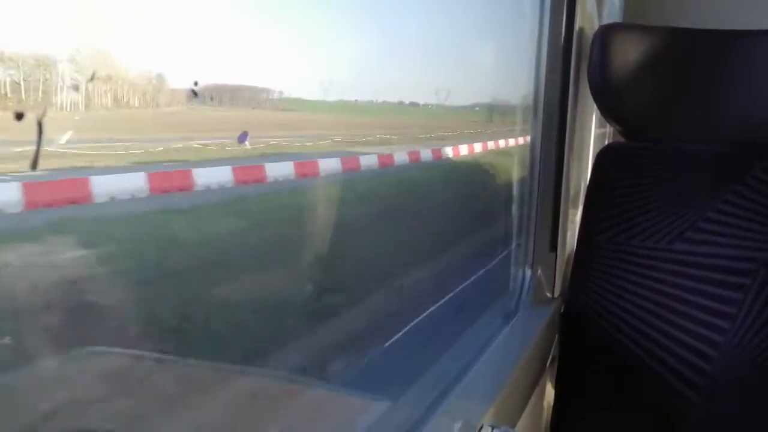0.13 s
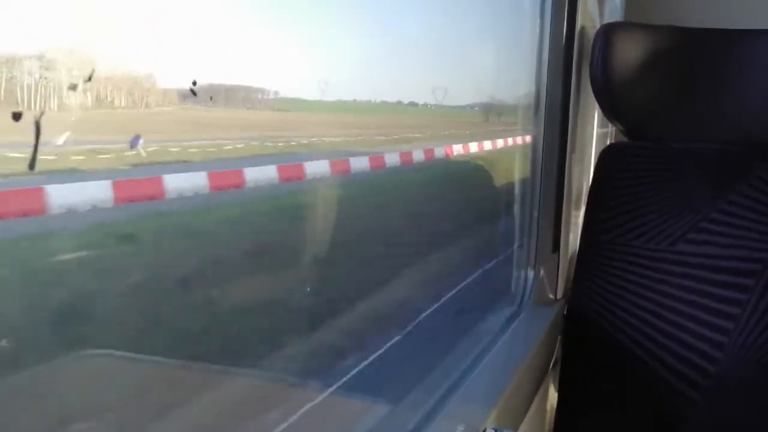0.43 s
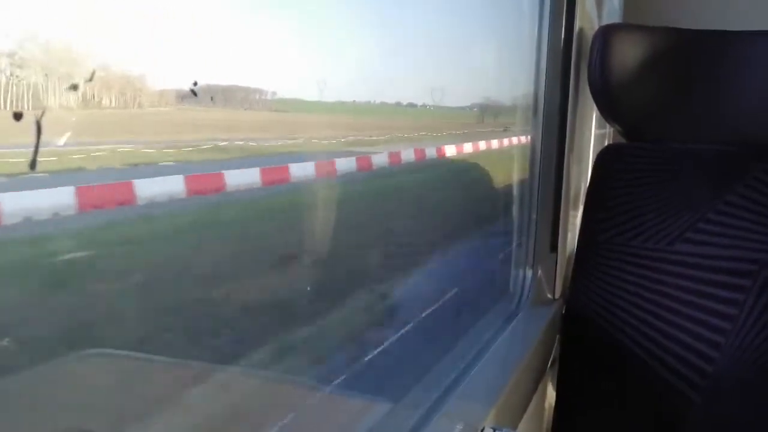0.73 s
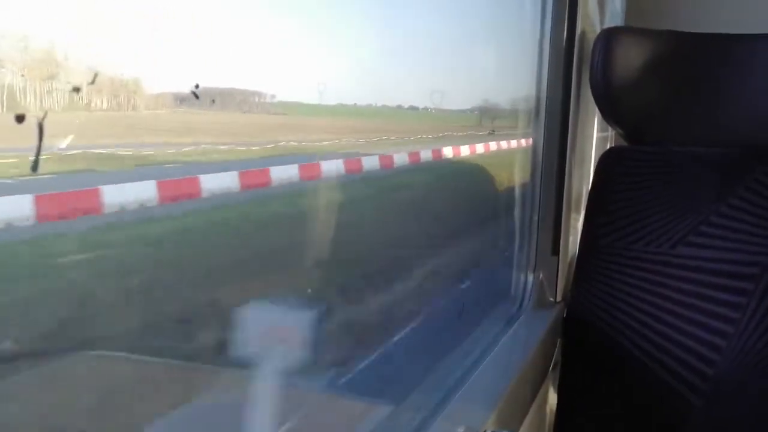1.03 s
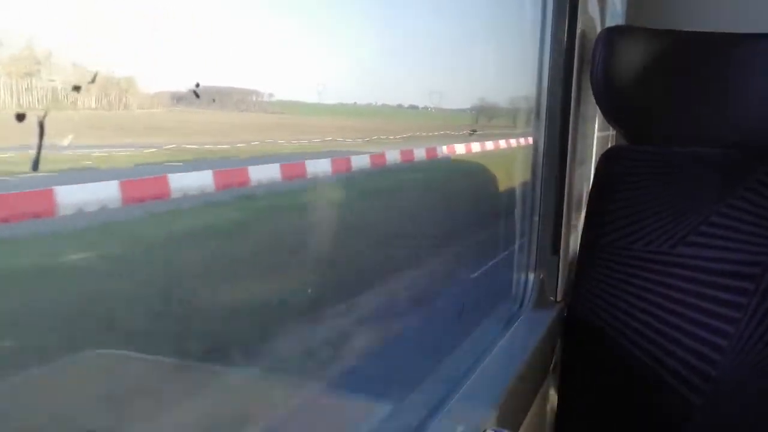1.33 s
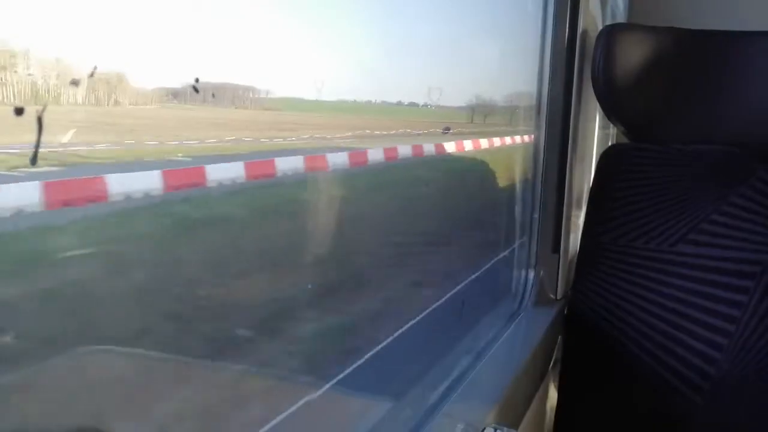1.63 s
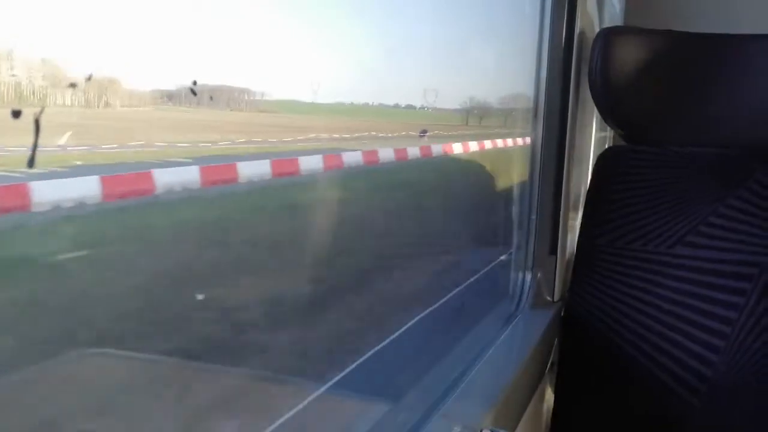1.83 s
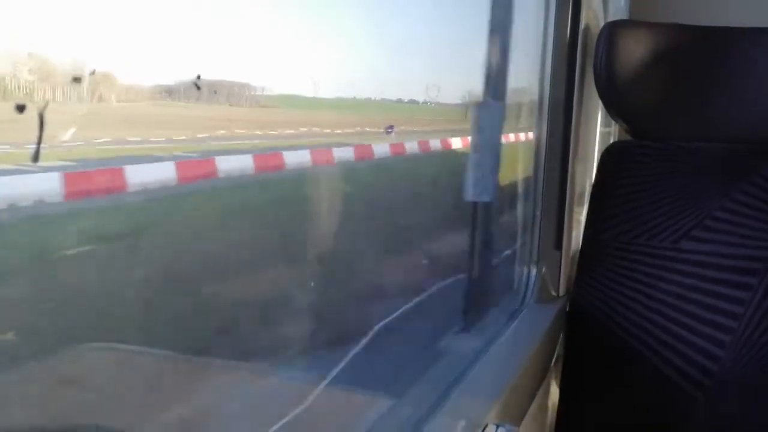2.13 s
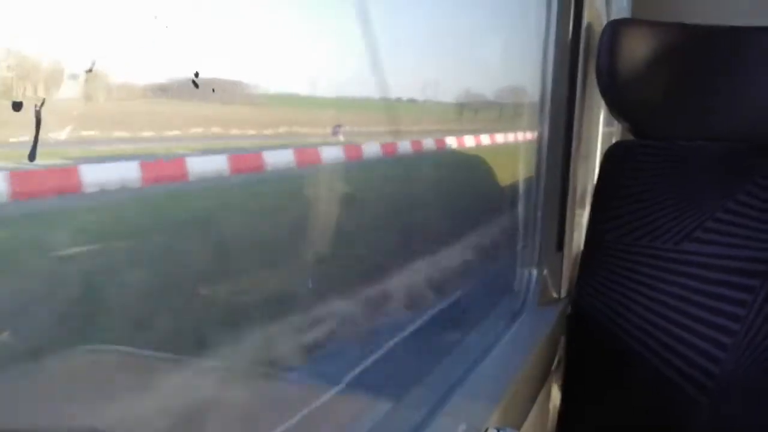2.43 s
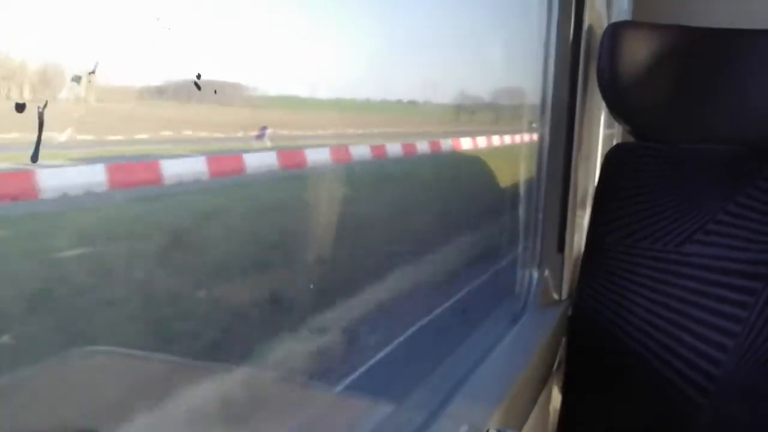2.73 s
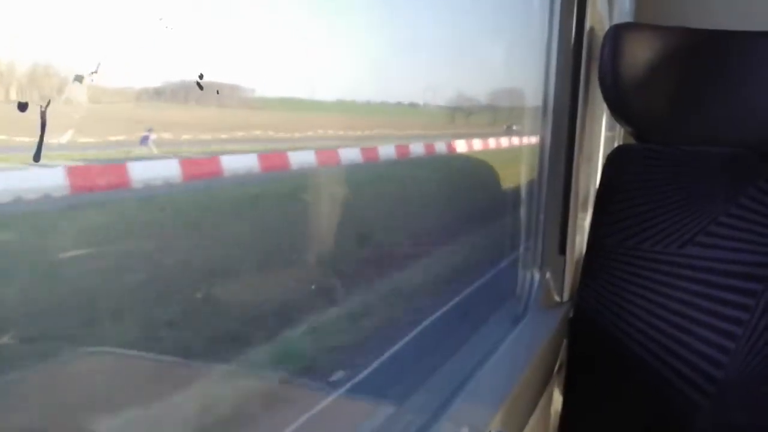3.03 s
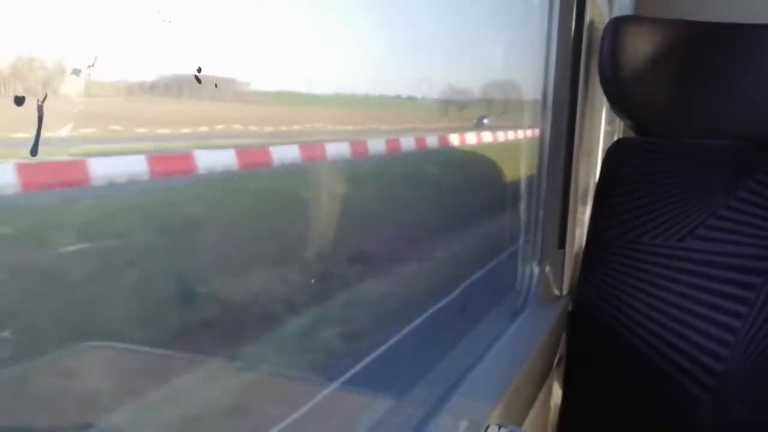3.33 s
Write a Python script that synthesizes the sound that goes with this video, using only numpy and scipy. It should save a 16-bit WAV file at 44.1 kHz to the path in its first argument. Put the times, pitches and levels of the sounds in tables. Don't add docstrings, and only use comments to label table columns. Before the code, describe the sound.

Steady deep rumble of a moving train inside the coach, with uneven low thuds, soft panel knocks, ventilation hiss and electrical hum; two brief creaking jolts; close, muffled small microphone at a seat.

```python
import sys
import numpy as np
from scipy import signal
from scipy.fft import rfft, irfft
from scipy.io import wavfile
from scipy.ndimage import uniform_filter1d

SR = 44100
rng = np.random.default_rng(int(sys.argv[2]) if len(sys.argv) > 2 else 0)


def output_pcm(signal):
    pcm = np.clip(np.atleast_2d(signal).T, -1, 1) * 32767
    wavfile.write(sys.argv[1], SR, np.round(pcm).astype(np.int16))


def voltage_ratio(level):
    return 10 ** (np.asarray(level, float) / 20)


N = 154350
TIME = np.arange(N) / SR


def evened(x):
    return x / np.sqrt(np.mean(x ** 2) + 1e-20)


def sine(cycles):
    return np.sqrt(2) * np.sin(2 * np.pi * cycles)


def along(points, t):
    return np.interp(t, *np.transpose(points))


def read(points, hz):
    low_end, high_end = (0.86, points[0][1] - 40), (SR / 2, points[-1][1] - 30)
    f, db = np.transpose([low_end] + list(points) + [high_end])
    return np.interp(np.log(hz + 1), np.log(f + 1), db)


def random_phases(count):
    return np.exp(2j * np.pi * rng.random(count // 2 + 1))


def coloured(points, count):
    hz = np.fft.rfftfreq(count, 1 / SR)
    return evened(irfft(random_phases(count) * voltage_ratio(read(points, hz)), count))


def ringing(table, count):
    hz = np.fft.rfftfreq(count, 1 / SR)
    power = 0
    for f, width, db in table:
        shape = 1 / (1 + ((hz - f) / width) ** 2) ** 2
        power = power + voltage_ratio(db) ** 2 * shape / shape.sum()
    return irfft(random_phases(count) * np.sqrt(power / 2) * count, count)


def burst(start, rise, hold, t60):
    t = TIME - start
    return np.clip(t / rise, 0, 1) * voltage_ratio(-60 * np.maximum(t - rise - hold, 0) / t60)


def swells(table, half_s, extra_db):
    out = np.zeros(N)
    for (peak_s, db, hz), phase in zip(table, rng.random((len(table), 1))):
        u = np.clip((TIME - peak_s) / half_s, -1, 1)
        out += voltage_ratio(db + extra_db) * np.cos(np.pi * u / 2) ** 2 * sine(hz * TIME + phase)
    return out


# frequency in Hz, level in dB per Hz.
RUMBLE_COLOUR = [(8, -1), (20, -4.5), (60, -0.5), (150, -2.5), (230, -11.5), (425, -18), (560, -26.5),
                 (900, -35)]
# time in seconds, rail level in dB, sway level in dB.
RAIL_AND_SWAY = [(0, 5, -7.5), (0.15, -6, 5), (0.3, 2.5, -3.5), (.53, -1.5, 3), (.7, 2, 0), (.95, -1, 0.5),
                 (1.298, 1, -0.5), (1.6, 2, 0.5), (1.949, 0, 0.5), (2.22, 0.5, 1), (2.452, -2, 3),
                 (2.75, 0, 1.5), (3.0, -1, 2), (3.2, 2, 0.5), (3.4, -3, -3), (3.5, 3.5, -8.5)]
BODY_RESONANCE_HZ = [19, 57, 83, 150, 193, 285, 311, 328, 338, 360, 383, 451, 468, 493]
# width in Hz, level in dB rms.
BODY_WIDTH_LEVEL = [(6, -55.5), (5, -57), (4, -60), (10, -56.5), (27, -63.5), (4.9, -68.5), (5.1, -67),
                    (9.2, -63.5), (7.3, -61), (24, -61), (12, -61.5), (9, -66.5), (14, -66), (19, -69)]


def wheels():
    t, rail_db, sway_db = np.transpose(RAIL_AND_SWAY)
    body = ringing([(f, *row) for f, row in zip(BODY_RESONANCE_HZ, BODY_WIDTH_LEVEL)], N)
    rumble = voltage_ratio(-44 + np.interp(TIME, t, rail_db)) * coloured(RUMBLE_COLOUR, N)
    return rumble + voltage_ratio(np.interp(TIME, t, sway_db)) * body


# frequency in Hz, level in dB per Hz.
AIR_COLOUR = [(450, -4), (950, 0.5), (1650, -11.5), (2600, -6.5), (3300, -10), (3950, -18.5), (5400, -7),
              (6800, -12.5)]
# time in seconds, level in dB.
GUSTS = [(0, -1.5), (.28, -2), (.45, 1), (.62, -1.5), (1.4, -1), (1.52, 0), (1.85, -2), (1.95, -0.5),
         (2.1, -1.5), (2.21, -4.5), (2.33, -3), (2.6, -2.5), (3, -1.5), (3.5, -1.5)]


def air():
    gust_from_hz, gust_full_hz = 2500, 4840
    frames, hz = N // 256 + 5, np.fft.rfftfreq(1024, 1 / SR)
    real, imaginary, patches = rng.standard_normal((frames, 513, 3)).T
    patches = uniform_filter1d(patches, size=24, axis=0)
    patches = evened(uniform_filter1d(patches, size=12, axis=1))
    gust_share = np.clip((hz - gust_from_hz) / (gust_full_hz - gust_from_hz), 0, 1)[:, None]
    gust_db = gust_share * along(GUSTS, np.arange(frames) * 256 / SR)
    db = read(AIR_COLOUR, hz)[:, None] + 0.59 * patches + gust_db
    hiss = signal.istft((real + 1j * imaginary) * voltage_ratio(db), nperseg=1024, noverlap=768)[1][:N]
    return voltage_ratio(-59.5) * evened(hiss)


# time in seconds, level in dB rms.
FLOOR_DRONE = [(0.0, -50.5), (0.15, -40), (0.25, -68), (0.31, -45.5), (0.82, -44.5), (0.92, -51),
               (1.0, -45), (1.53, -54.5), (1.76, -40.5), (1.82, -48.5), (2.1, -45.5), (2.15, -57),
               (2.23, -41.5), (2.31, -57), (2.69, -44), (2.93, -52.5), (3.1, -42), (3.5, -49.5)]
HUM_OVERTONES = [2, 4, 6, 8, 9, 10, 12, 13, 16, 17, 18, 19, 20, 21, 22, 23, 24, 25, 26, 27, 30, 31, 32, 34,
                 36, 40, 50, 62, 63, 71, 72]
HUM_OVERTONE_DB = [-66, -74, -76, -79, -72, -77, -79, -82, -91, -85, -88, -89, -86, -76.5, -87, -81, -84,
                   -75.5, -84, -90, -76.5, -86, -82, -86, -94, -90, -92, -91, -89, -92, -83]


def hum():
    hum_hz = 100.0635
    phase = rng.random(len(HUM_OVERTONE_DB) + 1)
    out = voltage_ratio(along(FLOOR_DRONE, TIME)) * sine(hum_hz * TIME + phase[0])
    for k, db, p in zip(HUM_OVERTONES, HUM_OVERTONE_DB, phase[1:]):
        out += voltage_ratio(db) * sine(k * hum_hz * TIME + p)
    return out


# frequency in Hz, level in dB rms.
GEAR_TONES = [(286, -63.5), (336, -57)]


def drivetrain():
    drift = rng.standard_normal((len(GEAR_TONES), N))
    for _ in range(2):
        drift = uniform_filter1d(drift, size=3000)
    drift = 0.01198 * evened(drift)
    return sum(voltage_ratio(db) * sine(np.cumsum(hz * (1 + d)) / SR) for (hz, db), d in zip(GEAR_TONES, drift))


# peak in seconds, level in dB rms, pitch in Hz.
PANEL_KNOCKS = [(0.04, -52, 256), (0.19, -53, 295), (0.21, -50, 383), (0.39, -49, 324), (0.4, -56, 476),
                (0.4, -48, 197), (0.44, -50, 326), (0.55, -49, 355), (0.57, -49, 201), (0.65, -48, 369),
                (0.72, -53, 285), (0.72, -51, 320), (0.76, -48, 345), (0.78, -51, 386), (0.82, -51, 322),
                (0.83, -52, 258), (0.86, -51, 386), (0.98, -50, 363), (1.08, -55, 468), (1.1, -52, 383),
                (1.15, -47, 166), (1.2, -51, 367), (1.28, -47, 193), (1.37, -45, 142), (1.42, -49, 330),
                (1.49, -50, 328), (1.52, -52, 293), (1.53, -51, 375), (1.56, -52, 287), (1.63, -44, 158),
                (1.83, -46, 162), (1.94, -43, 148), (1.99, -45, 156), (2.09, -50, 381), (2.1, -49, 353),
                (2.16, -42, 129), (2.17, -49, 195), (2.19, -50, 359), (2.22, -44, 146), (2.28, -53, 392),
                (2.29, -48, 334), (2.36, -49, 324), (2.37, -47, 154), (2.39, -52, 287), (2.39, -45, 121),
                (2.41, -49, 326), (2.44, -44, 135), (2.58, -50, 328), (2.59, -54, 461), (2.62, -43, 127),
                (2.67, -47, 345), (2.8, -49, 330), (2.85, -49, 328), (2.85, -44, 164), (2.91, -47, 164),
                (2.95, -46, 127), (3.17, -50, 197), (3.17, -49, 347), (3.19, -43, 154), (3.4, -45, 154)]


def knocks():
    return swells(PANEL_KNOCKS, half_s=0.045, extra_db=-1.5)


# peak in seconds, level in dB rms, pitch of the body resonance in Hz.
TRACK_DIPS = [(0.05, -48, 66), (0.06, -47, 18), (0.15, -45, 70), (0.24, -44, 66), (0.25, -42, 21),
              (0.42, -46, 55), (0.48, -50, 14), (0.58, -43, 64), (0.68, -43, 57), (0.74, -50, 29),
              (0.81, -49, 18), (0.85, -49, 55), (0.93, -46, 62), (0.94, -46, 74), (1.04, -45, 16),
              (1.14, -48, 14), (1.15, -44, 59), (1.28, -43, 55), (1.36, -43, 18), (1.45, -42, 86),
              (1.53, -41, 59), (1.61, -44, 62), (1.78, -48, 39), (1.81, -48, 23), (1.85, -46, 82),
              (1.93, -43, 55), (2.06, -46, 51), (2.13, -44, 88), (2.14, -45, 18), (2.2, -46, 21),
              (2.23, -42, 57), (2.33, -44, 66), (2.36, -45, 49), (2.49, -43, 21), (2.51, -46, 80),
              (2.56, -46, 47), (2.61, -47, 76), (2.67, -49, 39), (2.77, -47, 78), (2.81, -48, 16),
              (2.89, -44, 53), (2.89, -44, 86), (3.04, -47, 18), (3.04, -42, 53), (3.19, -43, 45),
              (3.23, -41, 62), (3.31, -46, 47), (3.39, -43, 16), (3.41, -46, 51), (3.49, -48, 14)]


def track_dips():
    return swells(TRACK_DIPS, half_s=0.085, extra_db=0.5)


# start in seconds, level in dB, creak pitch in Hz, floor ring in Hz, thump in dB.
COUPLING_JOLTS = [
    (.280, -42.5, 197, 356, -41),
    (1.708, -42.5, 203, 336, -52),
]
# multiple of the creak pitch, level in dB.
CREAK_OVERTONES = [(1, -16), (2, -15), (3, -14), (4, -24), (5, -28), (6, -27)]
# frequency in Hz, width in Hz, level in dB.
RATTLING_PARTS = [(160, 35, -4), (340, 30, -4), (570, 70, -12), (800, 150, -13), (1080, 150, -12)]


def coupling():
    creak_s, creak_sag = 0.06, 0.12
    out, rattle = np.zeros(N), ringing(RATTLING_PARTS, N)
    for start, db, creak_hz, floor_hz, thump_db in COUPLING_JOLTS:
        u = np.clip((TIME - start) / creak_s, 0, 1)
        turns = np.cumsum(creak_hz * (1 - creak_sag * u)) / SR
        swell = np.sin(np.pi * u ** 0.75) ** 1.3
        creak = swell * sum(voltage_ratio(d) * sine(round(k) * turns + k * k / (2 * np.pi)) for k, d in CREAK_OVERTONES)
        panel, beam = voltage_ratio(-7) * sine(288 * TIME), voltage_ratio(-3) * sine(192 * TIME)
        ring = sine(floor_hz * TIME) + panel + beam + np.sqrt(2) * voltage_ratio(-18) * rattle
        out += voltage_ratio(db) * (creak + burst(start, rise=0.035, hold=0.0025, t60=0.2) * ring)
        out += voltage_ratio(thump_db) * swell * sine(145 * TIME)
    return out


# frequency in Hz, level in dB per Hz.
PUFF_COLOUR = [(900, -14), (1800, -3), (2550, 2), (3300, -2), (4000, -9), (4700, -7), (5300, -2), (6500, 0),
               (7300, -4)]


def valve():
    return voltage_ratio(-56.5) * burst(2.375, rise=0.010, hold=0.016, t60=0.26) * coloured(PUFF_COLOUR, N)


def scene():
    rolling = wheels() + track_dips() + knocks() + drivetrain()
    return (rolling + air() + hum() + coupling() + valve())[None]


def band_limit(x):
    return signal.sosfilt(signal.butter(12, 15720, fs=SR, output="sos"), x)


def record(dry):
    hz = np.fft.rfftfreq(N, 1 / SR)
    fall_db = 22 * np.maximum(hz - 6850, 0) / 1000 + 60 * np.maximum(hz - 7560, 0) / 1000
    hiss = voltage_ratio(-97.5) * rng.standard_normal(dry.shape)
    return band_limit(irfft(rfft(dry) * voltage_ratio(-fall_db), N) + hiss)


dry = scene()
out = record(dry)
output_pcm(out)
```